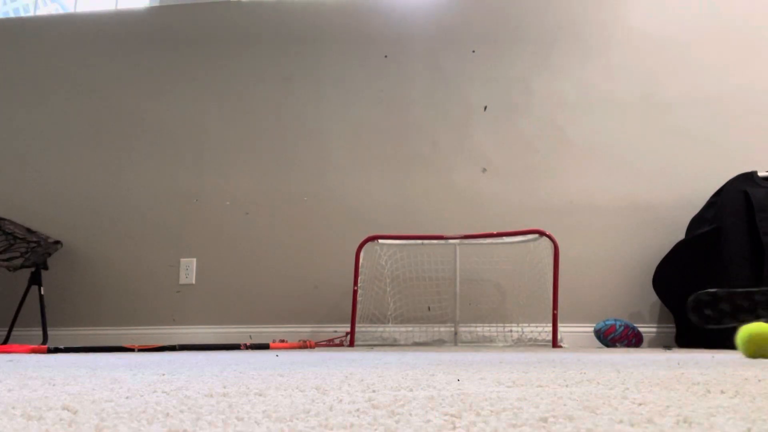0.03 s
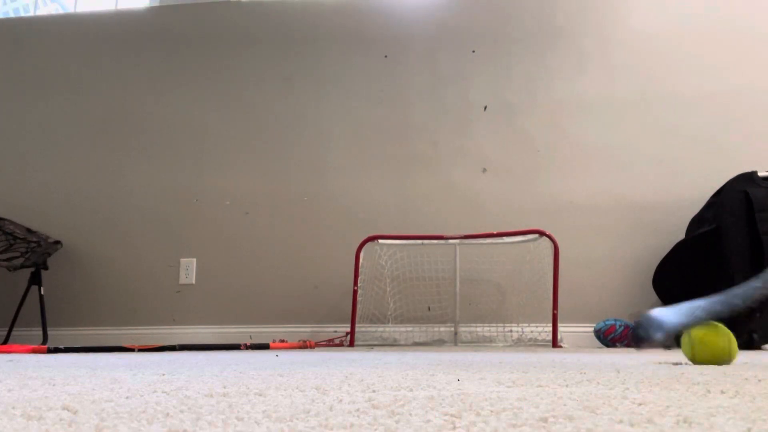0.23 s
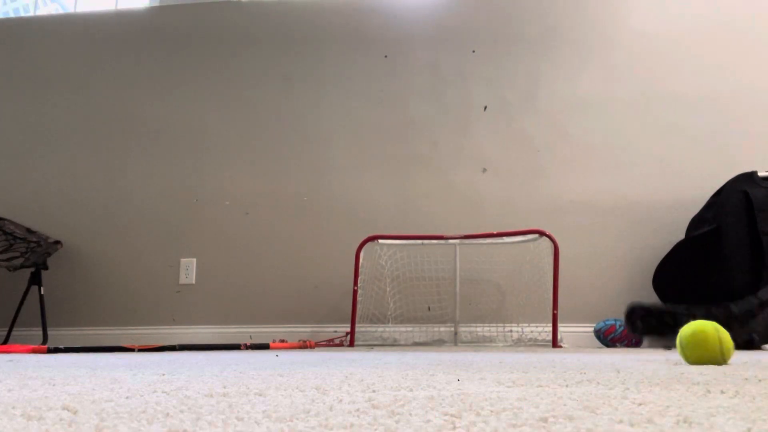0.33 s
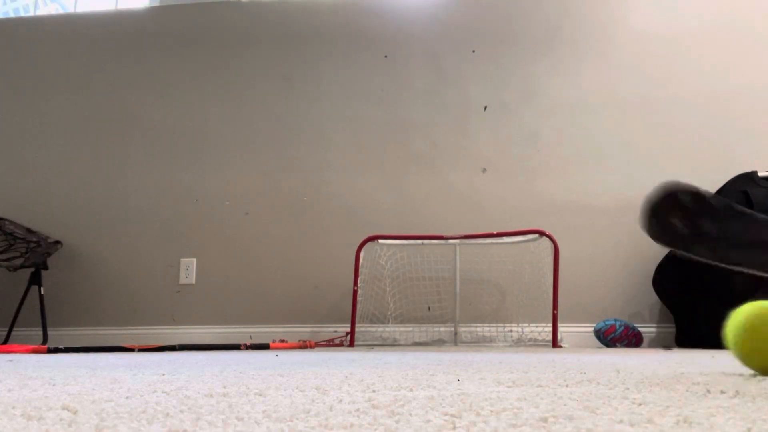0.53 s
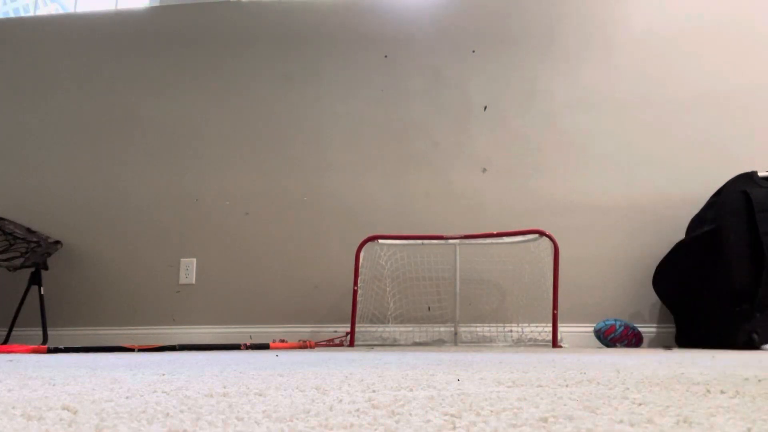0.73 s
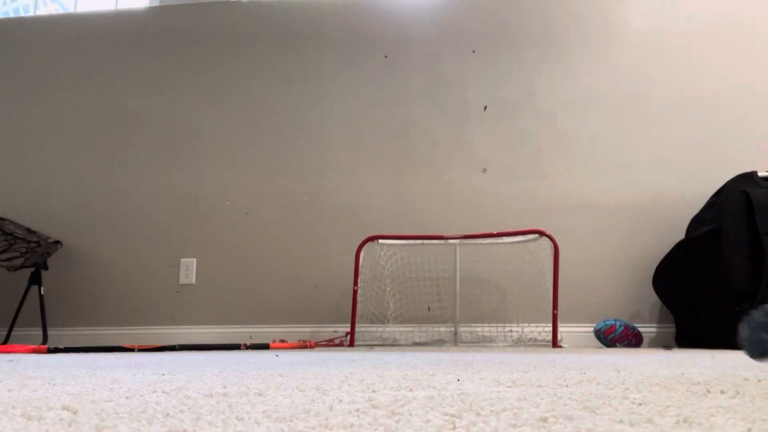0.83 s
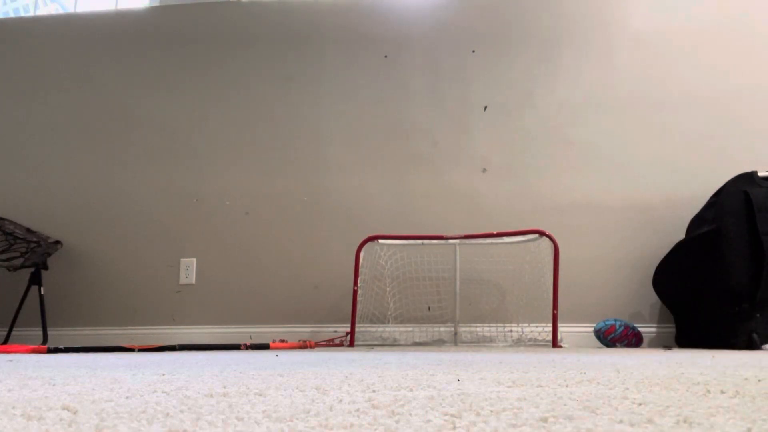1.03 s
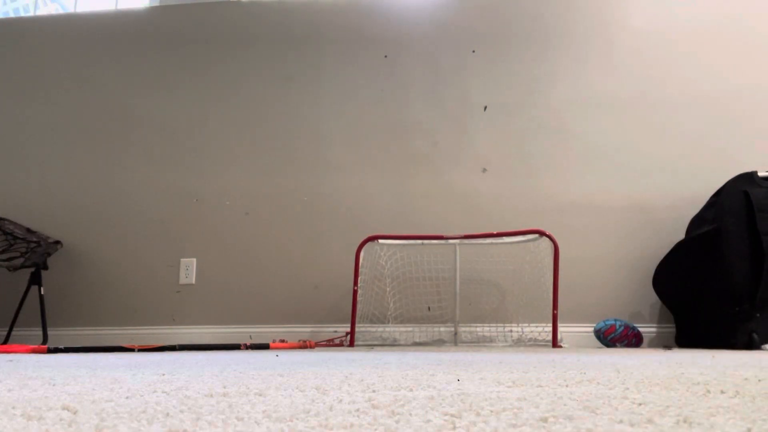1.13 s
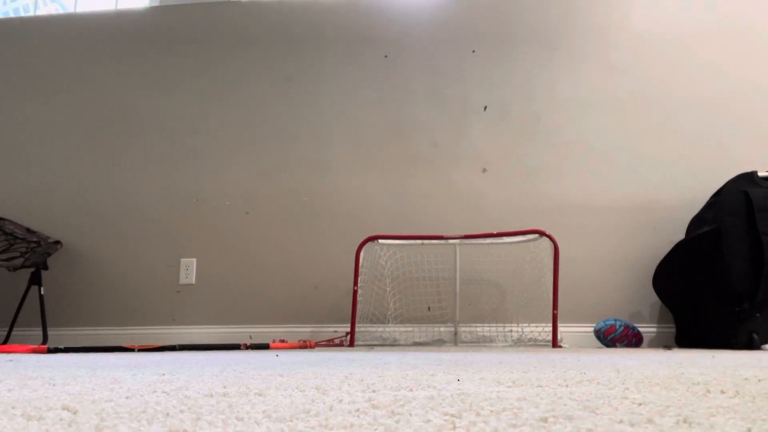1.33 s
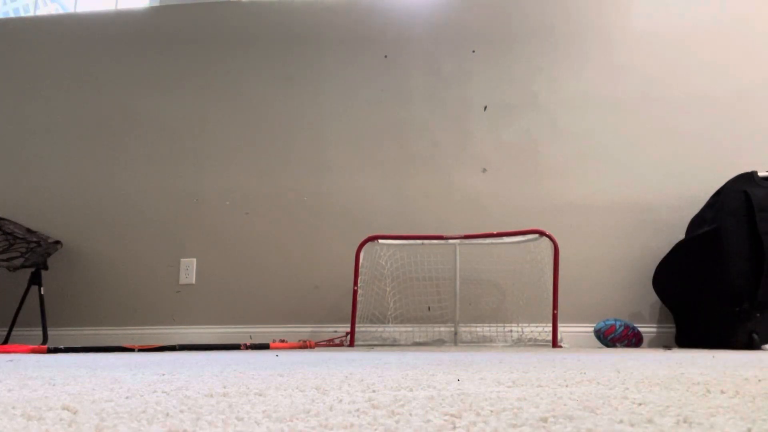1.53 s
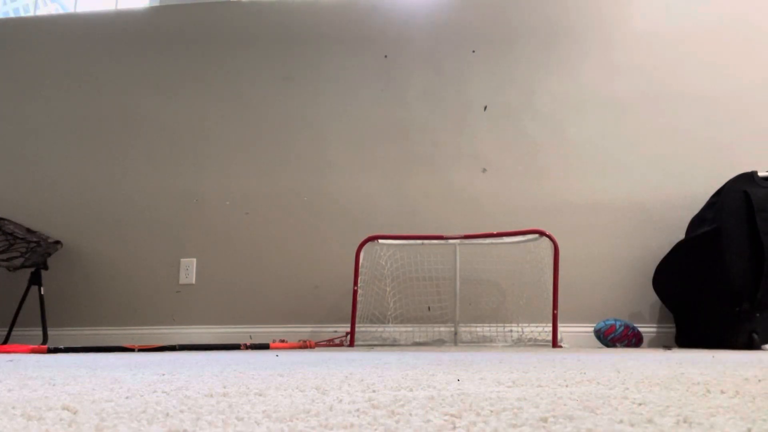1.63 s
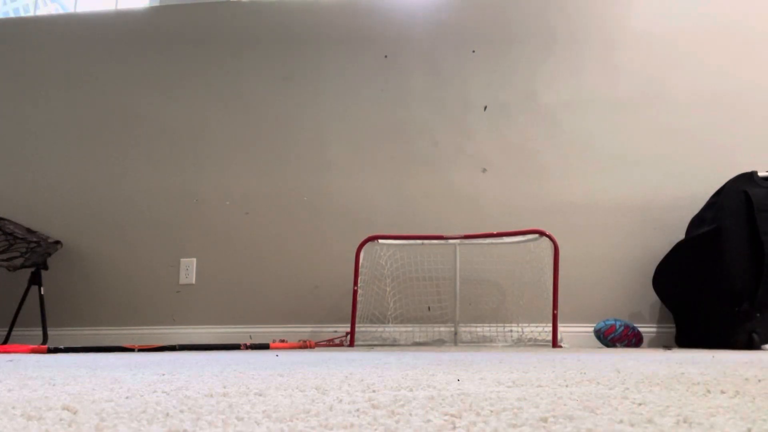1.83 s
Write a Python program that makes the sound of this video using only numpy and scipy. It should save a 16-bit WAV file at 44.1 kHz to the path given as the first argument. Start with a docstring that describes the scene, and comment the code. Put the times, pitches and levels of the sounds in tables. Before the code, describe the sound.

Short hollow knocks of a stick on a tennis ball in a small carpeted room.

```python
"""A tennis ball is knocked about with a stick on a carpet, just right of a microphone on a small room's floor.
Each knock: a slap of the ball's shell, a duller rebound, a low thump and the clack of the stick;
floor and room ring briefly. In between, stick and ball scuff the carpet, with faint narrow-band swishes
and a soft carpet rub. Low rumble and mains hum lie underneath."""
import sys
import numpy as np
from scipy import signal
from scipy.fft import rfft, irfft
from scipy.io import wavfile
from scipy.ndimage import uniform_filter1d

SR = 44100
rng = np.random.default_rng(int(sys.argv[2]) if len(sys.argv) > 2 else 0)


def file_out(sig):
    """Save sig as 16-bit WAV at sys.argv[1]."""
    # one column per channel
    cols = np.atleast_2d(sig).T
    # limit, then scale
    lim = np.clip(cols, -1, 1)
    pcm = np.round(lim * 32767).astype(np.int16)
    wavfile.write(sys.argv[1], SR, pcm)


N = 83790
KNOCK_N = SR // 5
LEFT_LAG_S = 0.00036

# blows on the ball: start_s, slap_db, slap_cutoff_hz, shell_pitch_ratio, low_modes_db, contact_s,
# rebound_re_slap_db, thump_db, thump_end_hz, thump_peak_s, floor_db, clack_db, clack_cutoff_hz,
# left_db, room_db
BLOWS = [(0.1972, -9, 1481, 0.98, 2, .0056, -1, -37, 178.4, .0072, -47.5, -52, 3000, 4, 2.5),
         (0.4255, 12.5, 1800, 1.048, 2, 0.0048, -5.5, -23.5, 148, 0.0061, -33.5, -17.5, 6430, -1.5, 2),
         (.6040, 12, 1360, 0.945, 3.5, 0.00421, -8, -24, 123, 0.0066, -40, -15, 2610, 0, -0.5),
         (1.0160, 10, 1450, 1.014, 2.5, .0051, -8.5, -25, 153.8, 0.0061, -38, -21, 2500, -.5, 1),
         (1.3515, -20, 1230, 0.935, 2, 0.00385, 4, -35.5, 167, 0.0069, -54.5, -49, 3000, -4, -1.5)]
# ball shell modes: pitch_hz, level_db, t60_s
SHELL_MODES = [(373.2, -15.5, 0.032), (522, -4.5, 0.015), (714, -7.5, 0.018), (1142, -4, 0.003),
               (1328.8, 3, 0.0056), (1749.6, -5, 0.0076344)]
# stick clack spectrum: freq_hz, gain_db
CLACK_SPECTRUM = [(300, -30), (1200, 9), (1900, 7.5), (2500, 0.5), (3400, 0.5), (4600, -6.5), (6000, -17),
                  (7500, -14.5), (16000, -24)]
# modes of the floor under the carpet: pitch_hz, level_db, t60_s
FLOOR_MODES = [(128.65, -4.5, .16), (153.96, -3, 0.4), (211.3, -10.5, 0.15), (305.4, 0, 0.147),
               (393, -10.5, 0.11)]
# shading of the left channel: freq_hz, gain_db
LEFT_SHADE = [(60, 2), (170, -4), (400, -3.5), (750, -4.5), (1250, -18.5), (2200, -2.5), (5000, -1.5)]
# room decay: freq_hz, t60_s
ROOM_DECAY = [(70, 0.21), (150, 0.74), (270, 0.65), (480, .36), (800, 0.35), (1350, 0.45), (2500, 0.41),
              (5000, 0.4), (12000, 0.0026)]
# room tail spectrum: freq_hz, gain_db
ROOM_SPECTRUM = [(60, 2), (140, -12), (200, -10.5), (300, -0.5), (440, -9.5), (580, -13), (780, -12.5),
                 (1000, -12.5), (1300, -13.5), (2200, -5.5), (5000, -3.5), (12000, -2)]
# left-right likeness of the room sound: freq_hz, correlation
ROOM_CORRELATION = [(60, 0.95), (200, 0.78), (400, 0.01), (900, 0), (1600, -.2), (4000, 0.08),
                    (16000, 0.14)]
# wall echoes: delay_s, gain_db
WALL_ECHOES = [(.0125, -27.5), (.0165, -18.5), (.0205, -20.5), (.0245, -22), (.030, -24.5)]
# carpet scuffs: start_s, length_s, hiss_db, rub_db
CARPET_SCUFFS = [(0.175, 0.078, -74.5, -79.5), (0.264, 0.32, -89.5, -79), (0.603, 0.0062, -68, -89),
                 (0.604, .04, -78.5, -91), (0.612, 0.16, -83.5, -83), (0.693, 0.19, -75, -99),
                 (0.892, 0.17, -113.5, -80.5), (0.979, 0.062, -70.5, -74.5), (1.024, 0.071, -76.5, -83),
                 (1.232, 0.011, -81.5, -101), (1.35, 0.0072, -75, -105), (1.437, 0.079, -74.5, -81.5),
                 (1.534, 0.33, -89, -80.5), (1.725, 0.19, -68, -67.5)]
# high scuffing hiss, as coloured by the microphone: freq_hz, gain_db
HISS_SPECTRUM = [(1500, -20), (4000, -7), (6300, -9.5), (8000, 3.5), (9800, 4), (11000, -6.5), (12300, -28),
                 (14000, -1), (15800, -6)]
# carpet rubbing: freq_hz, gain_db
RUB_SPECTRUM = [(150, -14), (450, -2.5), (750, -3.5), (1100, 1.5), (2000, 3), (2700, -3), (3900, -10),
                (5400, -7.5), (6900, -8.5), (9000, -25.5), (16000, -45)]
# faint narrow-band swishes and, last, a soft carpet rub: start_s, length_s, level_db, centre_hz
SWISHES_AND_RUB = [(0, 0.0862, -79, 4240), (0.311, 0.063, -80, 4230), (0.338, 0.133, -66.5, 798),
                   (0.917, 0.23, -65, 737), (1.829, .07, -68, 731)]
# room rumble: freq_hz, gain_db
RUMBLE_SPECTRUM = [(22, -25.5), (40, -8), (70, -1.5), (100, 2), (170, -2), (250, -11.5), (350, -21.5),
                   (520, -22), (750, -34), (1200, -40), (2000, -43.5), (4000, -50), (9500, -51.5),
                   (12200, -60.5), (15000, -57)]
# rumble swells: start_s, length_s, level_db
RUMBLE_SWELLS = [(0.464, 0.18, -50), (0.67, 0.15, -53), (1.532, 0.15504, -53.5)]


def ball_shell(slap_db, cutoff_hz, pitch_ratio, low_modes_db, contact_s, rebound_db):
    """The shell rings on contact and again, duller, on release."""
    lag_cycles, rise_cycles = 0.45, 0.61  # low modes start later and swell slower: the pitch falls
    low_modes_below_hz, trim_db = 900, -25
    t = np.arange(KNOCK_N) / SR
    shell = np.zeros(KNOCK_N)
    for hz, db, t60_s in SHELL_MODES:
        age_s = np.maximum(t - lag_cycles / hz, 0)
        rise = 1 - np.exp(-age_s * hz / rise_cycles)
        decay = amp(db + low_modes_db * (hz < low_modes_below_hz) - 60 * age_s / t60_s)
        shell += rise * decay * np.sin(2 * np.pi * hz * pitch_ratio * age_s)
    slap = amp(slap_db + trim_db) * lowpass(shell, cutoff_hz, order=4)
    rebound = amp(rebound_db) * delay(lowpass(slap, cutoff_hz=811.4, order=2), contact_s)
    return slap + rebound


def ball_thump(level_db, end_hz, peak_s, sag=1.99, sag_s=0.0026, sharpness=5.4):
    """The squeezed ball's thump swells while its pitch falls."""
    t = np.arange(KNOCK_N) / SR
    pitch_hz = end_hz * (1 + sag * np.exp(-t / sag_s))
    swell = (t / peak_s * np.exp(1 - t / peak_s)) ** sharpness
    return amp(level_db) * swell * np.sin(2 * np.pi * np.cumsum(pitch_hz) / SR)


def stick_clack(level_db, cutoff_hz, t60_s=0.021):
    """The stick's blade: a short dry rattle nearby, a clean crack to the room."""
    t = np.arange(KNOCK_N) / SR
    burst = rng.standard_normal(KNOCK_N) * amp(-60 * t / t60_s)
    drives = burst / np.linalg.norm(burst), signal.unit_impulse(KNOCK_N)
    return [amp(level_db) * lowpass(colour(x, CLACK_SPECTRUM), cutoff_hz, order=4) for x in drives]


def floor_ring(level_db, rise_s=0.0037):
    """The floor hums briefly under the blow."""
    t = np.arange(KNOCK_N) / SR
    modes = sum(amp(db - 60 * t / t60_s) * np.sin(2 * np.pi * (hz * t + rng.random()))
                for hz, db, t60_s in FLOOR_MODES)
    return amp(level_db) * (1 - np.exp(-t / rise_s)) ** 2 * modes


def room_reverb(x, build_s=0.013, left_echo_db=-11.5):
    """A few wall echoes, then a diffuse tail that dies band by band."""
    white = noise_pair([(20, 0), (20000, 0)], ROOM_CORRELATION, size=SR)
    hz, t, bands = signal.stft(white, SR, nperseg=512)
    decay_per_s = np.log(1000) / lookup(ROOM_DECAY, hz)[:, None]
    decay = np.exp(-decay_per_s * t) * np.sqrt(2 * decay_per_s / SR)  # equal energy per band
    band_gain = amp(lookup(ROOM_SPECTRUM, hz))[:, None]
    response = signal.istft(bands * decay * band_gain, SR, nperseg=512)[1]
    response *= np.minimum(np.arange(response.shape[1]) / SR / build_s, 1) ** 2
    for (delay_s, db), skew in zip(WALL_ECHOES, rng.uniform(-1, 1, len(WALL_ECHOES))):
        add(response[0], delay_s + skew * LEFT_LAG_S, amp([db + left_echo_db]))
        add(response[1], delay_s, amp([db]))
    return signal.fftconvolve(x[None], response, axes=1)[:, :N]


def knocks(crack_send_db=4):
    """Ball and stick reach the right channel first, the left shaded; each spot has its own reverb."""
    out = np.zeros((2, N))
    for start_s, *ball_row, floor_db, clack_db, clack_cutoff_hz, left_db, room_db in BLOWS:
        *shell_row, thump_db, thump_end_hz, thump_peak_s = ball_row
        ball = ball_shell(*shell_row) + ball_thump(thump_db, thump_end_hz, thump_peak_s)
        rattle, crack = stick_clack(clack_db, clack_cutoff_hz)
        right = ball + rattle
        left = amp(left_db) * delay(colour(right, LEFT_SHADE), LEFT_LAG_S)
        add(out, start_s, np.array([left, right]) + floor_ring(floor_db))
        add(out, start_s, amp(room_db) * room_reverb(ball + amp(crack_send_db) * crack))
    return out


def carpet_scuffs(hiss_correlation=0.6008, rub_correlation=0.13, grain_db=1):
    """High, grainy scuffing hiss, as coloured by the microphone, over a duller rubbing."""
    hiss_level, rub_level = np.zeros((2, N))
    for start_s, length_s, hiss_db, rub_db in CARPET_SCUFFS:
        add(hiss_level, start_s, amp(hiss_db) * stroke(length_s))
        add(rub_level, start_s, amp(rub_db) * stroke(length_s))
    flicker = unit_rms(uniform_filter1d(rng.standard_normal(N), size=90))
    grain = unit_rms(amp(grain_db * flicker))
    hiss = unit_rms(noise_pair(HISS_SPECTRUM, [(1, hiss_correlation)]))
    rub = unit_rms(noise_pair(RUB_SPECTRUM, [(1, rub_correlation)]))
    return grain * (hiss_level * hiss + rub_level * rub)


def swishes_and_rub(width_hz=410):
    """Faint narrow-band swishes and a soft carpet rub."""
    t = np.arange(N) / SR
    out = np.zeros((2, N))
    for start_s, length_s, level_db, centre_hz in SWISHES_AND_RUB:
        baseband = lowpass(rng.standard_normal((2, N)), width_hz / 2, order=2)
        band = unit_rms(baseband * np.sin(2 * np.pi * centre_hz * t))
        level = amp(level_db) * stroke(length_s)
        add(out, start_s, level * band[:, :len(level)])
    return out


def mains_hum(pitch_hz=59, level_db=-53):
    """One steady low tone."""
    return amp(level_db) * unit_rms(np.sin(2 * np.pi * (pitch_hz * np.arange(N) / SR + rng.random())))


def room_rumble(steady_db=-54.5, swell_cutoff_hz=287.6):
    """Low rumble that swells now and then."""
    swell_level = np.zeros(N)
    for start_s, length_s, level_db in RUMBLE_SWELLS:
        add(swell_level, start_s, amp(level_db) * stroke(length_s))
    deep = lowpass(noise_pair(RUMBLE_SPECTRUM, ROOM_CORRELATION), swell_cutoff_hz, order=2)
    steady = noise_pair(RUMBLE_SPECTRUM, ROOM_CORRELATION)
    return amp(steady_db) * unit_rms(steady) + swell_level * unit_rms(deep)


def amp(db):
    """Decibels to gain."""
    return 10 ** (np.asarray(db) / 20)


def unit_rms(x):
    """Scales to rms 1."""
    return x / np.sqrt(np.mean(x ** 2) + 1e-20)


def lookup(table, hz):
    """Interpolates on a log-frequency axis."""
    table_hz, values = np.transpose(table)
    return np.interp(np.log(hz + 1), np.log(table_hz + 1), values)


def add(mix, start_s, sound):
    """Mixes a sound in, in place."""
    part = mix[..., max(round(start_s * SR), 0):][..., :sound.shape[-1]]
    part += sound[..., :part.shape[-1]]


def colour(x, spectrum):
    """Minimum-phase filter from (freq_hz, gain_db) points."""
    hz = abs(np.fft.fftfreq(4096, 1 / SR))
    log_gain = np.log(amp(lookup(spectrum, hz)))
    response = np.exp(np.conj(signal.hilbert(log_gain)))
    taps = np.fft.ifft(response).real[:2048]
    return signal.fftconvolve(x, taps)[:len(x)]


def lowpass(x, cutoff_hz, order):
    """Maximally flat low-pass."""
    return signal.sosfilt(signal.butter(order, cutoff_hz, fs=SR, output="sos"), x)


def delay(x, delay_s):
    """Fractional-sample delay."""
    index = np.arange(len(x))
    return np.interp(index - delay_s * SR, index, x, left=0)


def noise_pair(spectrum, correlation, size=N):
    """Coloured noise, partly alike left and right."""
    hz = np.fft.rfftfreq(size, 1 / SR)
    right, independent = rfft(rng.standard_normal((2, size)))
    shared = lookup(correlation, hz)
    left = shared * right + np.sqrt(1 - shared ** 2) * independent
    return irfft(np.array([left, right]) * amp(lookup(spectrum, hz)), size)


def stroke(length_s):
    """Half-sine swell and fade."""
    return np.sin(np.pi * np.linspace(0, 1, round(length_s * SR)))


def scene():
    """All sources, left and right."""
    return knocks() + carpet_scuffs() + swishes_and_rub() + mains_hum() + room_rumble()


def record(dry):
    """The recorder's low cut and band limit."""
    low_cut_hz, band_limit_hz = 52, 15800
    low_cut = signal.butter(2, low_cut_hz, "highpass", fs=SR, output="sos")
    band_limit = signal.firwin(511, band_limit_hz, window=("kaiser", 9), fs=SR)
    return signal.oaconvolve(signal.sosfilt(low_cut, dry), band_limit[None], "same")


dry = scene()
out = record(dry)
file_out(out)
```